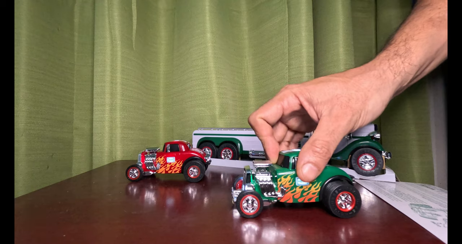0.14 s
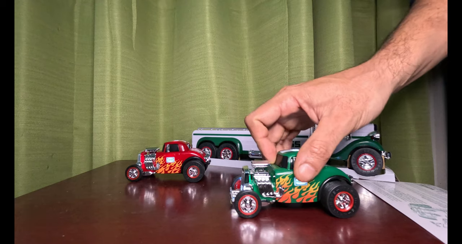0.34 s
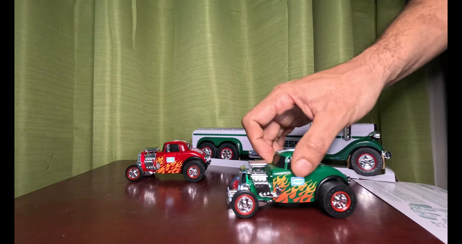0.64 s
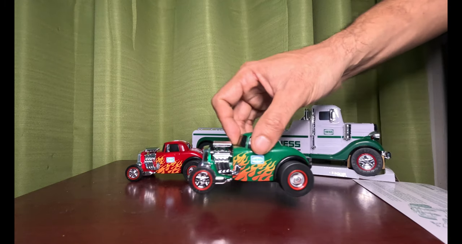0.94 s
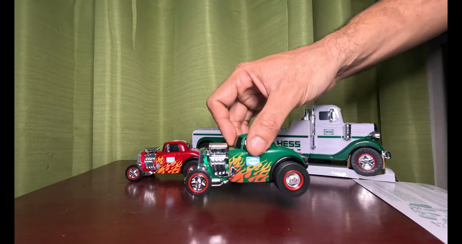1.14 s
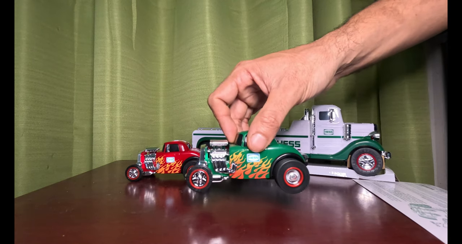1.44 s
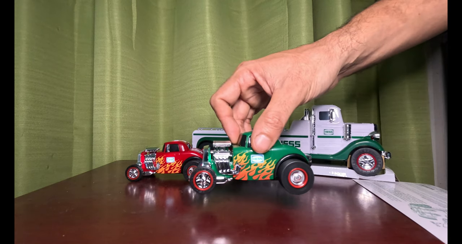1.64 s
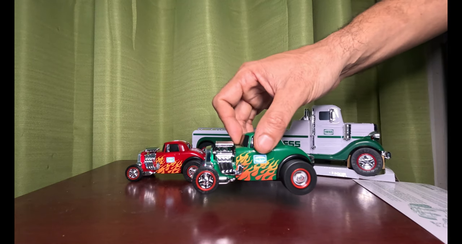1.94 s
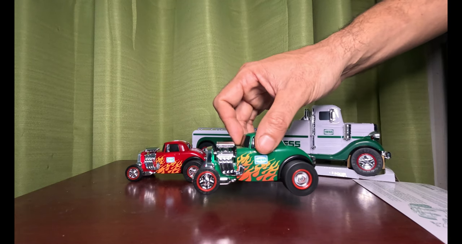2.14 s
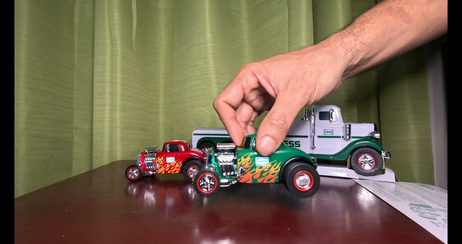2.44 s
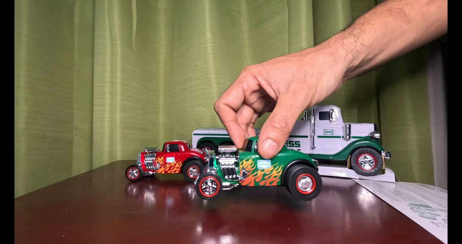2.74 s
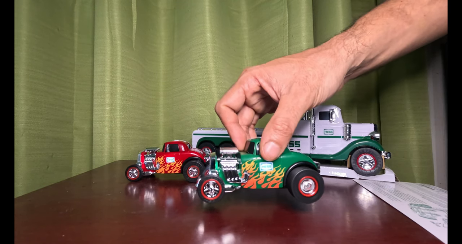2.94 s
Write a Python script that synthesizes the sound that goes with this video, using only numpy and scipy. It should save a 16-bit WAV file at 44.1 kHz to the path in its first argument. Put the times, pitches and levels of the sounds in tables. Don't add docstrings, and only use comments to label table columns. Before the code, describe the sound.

A toy car's spring motor, held by hand above a wooden table: faint finger clicks and soft thumps first, then gears spin up into rapid uneven rattling until the end, close stereo microphones, small room.

```python
import sys
import numpy as np
from scipy import signal
from scipy.fft import rfft, irfft
from scipy.io import wavfile
from scipy.ndimage import uniform_filter1d

SR = 44100
rng = np.random.default_rng(int(sys.argv[2]) if len(sys.argv) > 2 else 0)


def pcm_store(signal):
    levels = np.round(np.clip(np.atleast_2d(signal), -1, 1) * 32767)
    wavfile.write(sys.argv[1], SR, levels.astype(np.int16).T)


def ratio_of_db(decibels):
    return 10 ** (np.asarray(decibels, float) / 20)


N = 136710

# frequency_hz, density_db
FLOOR_SPECTRUM = [(25, -8.5), (65, -4), (110, -16), (250, -25.5), (400, -38.5), (900, -43.5), (6000, -58.5),
                  (11000, -68)]
# frequency_hz, coherence_0_to_1
FLOOR_COHERENCE = [(60, 0.94), (130, 0.95), (290, 0.12)]
# frequency_hz, left_minus_right_db
MIC_LEVEL = [(1000, -1), (5200, -2.5), (6600, 0), (8200, -3), (10000, -4), (13000, 0.5)]
# frequency_hz, left_lead_rad
MIC_PHASE = [(800, 0.042), (6000, -0.76), (7400, -1.22), (9000, -0.66)]
# top_s, peak_db, pitch_hz, swell_s, fade_s
TABLE_BOOMS = [(0.0, -35.5, 62.5, .02, 0.19), (.28, -35.5, 89.3, 0.036, 0.033),
               (0.369, -28, 81.4, 0.029, 0.027), (0.448, -28.5, 68, 0.026, 0.028),
               (0.507, -28.5, 72.4, 0.013, 0.024), (0.629, -37.5, 77.4, 0.1, 0.1),
               (0.704, -29.5, 85.3, 0.003, 0.056), (0.981, -47.5, 73.8, 0.16, 0.12),
               (1.222, -26.5, 69.3, 0.065, 0.052), (1.309, -32.5, 61, 0.016, 0.015),
               (1.385, -37, 70, 0.072, 0.058), (1.541, -38.5, 63.5, 0.02, 0.027),
               (1.97, -35.5, 73.3, 0.057, 0.1), (2.057, -35, 63.8, 0.0083, 0.069),
               (2.273, -37.5, 93.5, 0.044, 0.047), (2.76, -32.5, 68.8, 0.06, 0.094)]
# start_s, peak_db, ring_hz, t60_s
FINGER_TICKS = [
    (0.454, -49.5, 1210, 0.026),
    (0.486, -63, 5500, 0.021),
    (.505, -54.5, 5830, 0.023),
    (0.715, -42.5, 1230, 0.03),
    (.724, -37, 3160, 0.036),
    (0.754, -44, 4300, 0.03),
    (.787, -40, 1310, 0.029),
    (.788, -45, 3430, 0.033),
    (.836, -37, 1740, 0.047),
]
# start_s, top_s, end_s, level_db
TYRE_SCUFFS = [
    (-.1, 0.054, 0.6, -63),
    (0.59, 0.647, 0.684, -62.5),
]
# centre_hz, width_hz, level_db
DULL_SCUFF = [(1340, 190, 2), (1633, 130, 4.5), (4500, 1500, -22)]
# centre_hz, width_hz, level_db
BRIGHT_SCUFF = [(1950, 1300, 3.5), (5200, 490, -3), (6440, 810, 0), (10300, 910, -7)]
# time_s, level_db
SPIN_EFFORT = [(.795, -75), (.838, -48.5), (.88, -43), (.93, -36.5), (.965, -32), (1.02, -29.5),
               (1.1, -29.5), (1.2, -32.5), (1.26, -64)]
# time_s, level_db
FIRST_CATCHES = [
    (.842, -42.5),
    (.852, -54),
    (.861, -48),
    (.880, -44),
    (.901, -44),
    (.915, -32.5),
    (.959, -29),
]
# start_s, length_s, level_db
EARLY_BURSTS = [(1.1, 0.0059, -20), (1.124, 0.016, -21), (1.16, 0.031, -17.5), (1.2, 0.031, -22),
                (1.286, 0.051, -17), (1.35, 0.0085, -19), (1.37, 0.027, -17.5), (1.407, 0.071, -20.5),
                (1.511, 0.045, -27), (1.556, 0.063, -36.5), (1.604, 0.026, -25), (1.636, 0.0036, -21.5),
                (1.652, 0.027, -23), (1.7, 0.021, -18.5), (1.72, 0.03, -20.5), (1.774, 0.0092, -20.5),
                (1.808, 0.014, -20.5), (1.83, 0.022, -20.5), (1.867, 0.034, -18), (1.909, 0.006, -15.5),
                (1.934, 0.018, -21.5), (1.959, 0.045, -19.5), (2.015, 0.019, -20.5), (2.045, 0.016, -20)]
# start_s, length_s, level_db
LATE_BURSTS = [(2.08, 0.017, -24), (2.12, 0.03, -19.0), (2.164, 0.065, -19.5), (2.238, 0.041, -20.5),
               (2.276, 0.012, -21), (2.303, 0.041, -20.5), (2.364, 0.022, -19), (2.391, 0.013, -19.5),
               (2.421, 0.0053, -17.5), (2.442, 0.02, -18.5), (2.477, 0.054, -19), (2.543, 0.029, -22.5),
               (2.56, 0.039, -21), (2.607, 0.0052, -17), (2.63, 0.004, -18.5), (2.654, 0.015, -24.5),
               (2.711, 0.072, -19), (2.794, 0.011, -20), (2.826, 0.022, -17), (2.855, 0.0604, -21),
               (2.929, 0.032, -21.5), (2.965, 0.031, -19), (3.027, .003, -22), (3.034, 0.0078, -18.5),
               (3.061, 0.01, -22), (3.084, 0.0082, -19.5)]
# time_s, level_db
EARLY_SLAMS = [(1.113, -21.4), (1.1328, -19.3), (1.1546, -21.0), (1.1836, -18.3), (1.2024, -17.9),
               (1.2142, -21.3), (1.2656, -18.2), (1.2944, -16.3), (1.2995, -20.1), (1.3106, -18.3),
               (1.3198, -17.3), (1.3315, -16.4), (1.3518, -19.3), (1.362, -16.7), (1.3952, -20.0),
               (1.4105, -18.1), (1.4255, -18.2), (1.4439, -16.9), (1.4959, -20.5), (1.5309, -22.0),
               (1.5399, -19.6), (1.6064, -20.1), (1.6128, -19.0), (1.6396, -20.6), (1.6625, -18.9),
               (1.7071, -16.9), (1.7285, -20.6), (1.7352, -18.0), (1.7454, -16.8), (1.7576, -19.7),
               (1.7842, -19.9), (1.8006, -16.4), (1.8211, -19.2), (1.8349, -18.1), (1.8416, -18.8),
               (1.8915, -15.8), (1.9144, -18.5), (1.9194, -18.5), (1.9357, -21.3), (1.9474, -18.2),
               (1.9615, -18.2), (1.9676, -19.0), (1.9778, -19.2), (1.987, -17.7), (1.9945, -16.8),
               (2.0182, -16.5), (2.0294, -18.2), (2.0583, -17.7), (2.0669, -21.1), (2.0873, -19.9)]
# time_s, level_db
LATE_SLAMS = [(2.1293, -17.2), (2.1387, -19.4), (2.1717, -18.9), (2.1965, -20.2), (2.2064, -20.5),
              (2.2166, -20.5), (2.2411, -21.2), (2.2536, -17.6), (2.2613, -17.6), (2.27, -17.8),
              (2.2819, -18.5), (2.2866, -21.1), (2.3108, -19.2), (2.3217, -17.9), (2.3425, -21.3),
              (2.3837, -20.4), (2.3933, -20.5), (2.4083, -19.2), (2.4292, -21.3), (2.45, -20.9),
              (2.487, -16.8), (2.518, -18.6), (2.5315, -20.6), (2.5512, -19.9), (2.5639, -17.8),
              (2.5818, -19.9), (2.6148, -17.7), (2.6377, -21.4), (2.6649, -21.1), (2.7131, -20.3),
              (2.7239, -18.7), (2.7417, -20.3), (2.7591, -19.6), (2.771, -17.7), (2.8056, -21.5),
              (2.8395, -18.0), (2.8568, -19.7), (2.864, -20.0), (2.8707, -18.7), (2.892, -19.6),
              (2.903, -16.8), (2.9082, -18.4), (2.9518, -17.0), (2.9729, -19.5), (2.9972, -20.8),
              (3.0077, -22.4), (3.0216, -18.4), (3.0435, -21.8), (3.0678, -18.3), (3.0934, -19.5)]
# centre_hz, width_hz, level_db
SHELL_MODES = [(1337, 100, -3.5), (1620, 380, -11.5), (2170, 1500, -19), (3870, 455, -7.5),
               (4300, 490, -9.5), (4820, 644, -3.5), (4960, 310, -4.5), (5415, 280, -7.5), (5720, 21, -9.5),
               (6600, 670, -18), (7310, 630, -15.5), (9930, 1250, -16.5), (13330, 940, -37)]
# centre_hz, width_hz, gain_db
SHELL_HOLLOWS = [(1478, 221, -13), (2760, 166, -7), (5700, 210, 1)]
# centre_hz, width_hz, level_db
AXLE_MODES = [(477, 430, -19), (1390, 250, 5.5), (1924, 480, -1), (3370, 1900, -10)]
# centre_hz, width_hz, level_db
WHINE_MODES = [(7000, 560, 1), (10600, 750, 0.5)]

SLAM_LEAD_S = 0.0012


def evened(x):
    return x / np.sqrt(np.mean(x ** 2) + 1e-20)


def read(points, hz):
    f, value = np.transpose(points)
    return np.interp(np.log(hz + 1), np.log(f + 1), value)


def add(mix, s, sound):
    part = mix[round(s * SR):][:len(sound)]
    part += sound[:len(part)]


def body(peaks, hollows=(), ripple_db=0., skirt_db=-42.0, spot_db=0., shelf_db=-60.0, smear_s=0.):
    low_edge_hz = 997
    hz = np.fft.rfftfreq(8192, 1 / SR)
    power = ratio_of_db(2 * skirt_db) / (1 + (hz / 9000) ** 8)
    for f, w, db in peaks:
        power = power + ratio_of_db(2 * db) / (1 + (2 * (hz - f) / w) ** 2) ** 1.32
    shelf = ratio_of_db(2 * shelf_db) / (1 + (hz / 1000) ** 8 + (200 / (hz + 1)) ** 4)
    log = 0.5 * np.log(power / (1 + (low_edge_hz / (hz + 1)) ** 16) + shelf + 1e-9)
    for f, w, db in hollows:
        log += np.log(ratio_of_db(db)) / (1 + (2 * (hz - f) / w) ** 2)

    fine, broad, late = rng.standard_normal((3, len(hz)))
    delay = smear_s * abs(evened(uniform_filter1d(late, size=200)))
    lag = 2 * np.pi * hz[1] * np.cumsum(delay)
    log += np.log(ratio_of_db(ripple_db)) * evened(uniform_filter1d(fine, size=12))
    log += np.log(ratio_of_db(spot_db)) * evened(uniform_filter1d(broad, size=200))

    fold = irfft(log) * np.r_[1, 2 * np.ones(4095), 1, np.zeros(4095)]
    ring = irfft(np.exp(rfft(fold) - 1j * lag))[:4096]
    return ring / np.linalg.norm(ring)


def floor(shake):
    frames, hz = N // 512 + 5, np.fft.rfftfreq(2048, 1 / SR)
    a, b, c, d = rng.standard_normal((frames, 1025, 4)).T
    shaking = uniform_filter1d(abs(shake), size=9000)
    stir = 1 + ratio_of_db(37.5) * np.interp(np.arange(frames) * 512, np.arange(N), shaking)
    same = np.clip(read(FLOOR_COHERENCE, hz), 0, 1)[:, None]
    left = a + 1j * b
    right = same * left + np.sqrt(1 - same ** 2) * (c + 1j * d)
    z = np.array([left, right])
    z *= ratio_of_db(read(FLOOR_SPECTRUM, hz))[:, None] * np.where(hz[:, None] < 300, stir, 1)
    noise = signal.istft(z, nperseg=2048, noverlap=1536)[1][:, :N]
    return ratio_of_db(-47) * evened(noise)


def table():
    sag, sag_s = 0.19, 0.17
    out, t = np.zeros(N), np.arange(N) / SR
    for top, db, hz, swell, fade in TABLE_BOOMS:
        u = t - top
        shape = np.where(u < 0, np.exp(-(u / swell) ** 2), np.exp(-(abs(u) / fade) ** 1.08))
        bend = sag * 0.039 * np.log(np.cosh(np.clip(u / sag_s, -9, 9)))
        out += ratio_of_db(db) * shape * np.cos(2 * np.pi * hz * (u - bend))
    return out


def at_each_mic(x, taps):
    taps = taps / np.linalg.norm(taps, axis=1, keepdims=True)
    return signal.fftconvolve(x[None], taps, axes=1)[:, :N]


def room(x):
    t60_s, dull_hz = 0.5, 5000
    t = np.arange(SR // 4) / SR
    taps = rng.standard_normal((2, len(t))) * (rng.random((2, len(t))) < 0.06)
    taps = taps * ratio_of_db(-60 * t / t60_s) * (t > 0.002)
    return at_each_mic(x, signal.lfilter([1], [1, -np.exp(-2 * np.pi * dull_hz / SR)], taps))


def scatter(x):
    decay_s = 0.0072
    taps = rng.standard_normal((2, 600)) * np.exp(-np.arange(600) / (decay_s * SR))
    bright = signal.sosfilt(signal.butter(2, 10300, "high", fs=SR, output="sos"), x)
    return at_each_mic(bright, taps)


def fingers():
    out, t, whole = np.zeros(N), np.arange(3000) / SR, np.arange(N) / SR
    tick_low_pass = signal.butter(6, 10500, fs=SR, output="sos")
    for s, db, hz, t60 in FINGER_TICKS:
        puff = rng.standard_normal(len(t)) * ratio_of_db(-60 * t / t60)
        ring = signal.fftconvolve(puff, body([(hz, 0.3 * hz, 0)], skirt_db=-37))[:len(t)]
        ring = signal.sosfilt(tick_low_pass, ring)
        add(out, s, ratio_of_db(db) * ring / abs(ring).max())
    for (start, top, end, db), colour in zip(TYRE_SCUFFS, (DULL_SCUFF, BRIGHT_SCUFF)):
        stroke = np.interp(whole, [start, top, end], [0, 1, 0]) ** 1.27
        out += ratio_of_db(db) * signal.oaconvolve(stroke * rng.standard_normal(N), body(colour))[:N]
    return out


def slams():
    rise_s, fall_s, gain_db = 0.001, 0.0014, 1.1
    t, power = np.arange(N) / SR, np.zeros(N)
    for s, db in list(FIRST_CATCHES) + list(EARLY_SLAMS) + list(LATE_SLAMS):
        first = round(s * SR) - 400
        u = t[first:][:800] - s + SLAM_LEAD_S
        jolt = np.exp(-(u / np.where(u < 0, rise_s, fall_s)) ** 2)
        add(power, first / SR, ratio_of_db(2 * (db + gain_db)) * jolt)
    return power


def bursts(t):
    bite_s, let_go_s, gain_db, arch = 0.0019, 0.0024, -2, 0.38
    power = np.zeros(N)
    for start, length, db in list(EARLY_BURSTS) + list(LATE_BURSTS):
        before = np.maximum((start - t) / bite_s, 0)
        after = np.maximum((t - start - length) / let_go_s, 0)
        gate = np.exp(-2 * np.minimum(before + after, 30))
        progress = np.clip((t - start) / length, 0, 1)
        sink = 1 - arch * np.cos(np.pi * progress ** 0.39) ** 2
        power += ratio_of_db(2 * (db + gain_db)) * gate * sink
    return power


def teeth(t):
    wind_up_s, teeth_per_s, uneven_db, grit = 0.106, 900, 3, 0.43
    flutter_db, flutter_s, hold_s = 3.5, 0.0032, 0.0079
    speed = np.clip((t - SPIN_EFFORT[0][0]) / wind_up_s, 0.7, 1)
    knocks = (rng.random(N) < speed * teeth_per_s / SR) * rng.choice([-1, 1], N)
    knocks = knocks * ratio_of_db(uneven_db * np.minimum(rng.exponential(1, N), 3))
    wander = uniform_filter1d(rng.standard_normal(N), size=40)
    flutter = ratio_of_db(flutter_db * evened(signal.lfilter([1], [1, -np.exp(-1 / (flutter_s * SR))], wander)))
    drive = (evened(knocks) + grit * speed * rng.standard_normal(N)) * flutter
    local_power = signal.oaconvolve(drive ** 2, np.hanning(int(2 * hold_s * SR)), "same")
    return evened(drive / np.sqrt(local_power.clip(1e-6))), flutter


def steadied(x, power):
    steadiness = 0.56
    low = signal.sosfiltfilt(signal.butter(2, 1510, fs=SR, output="sos"), x)
    both = [np.roll(power, round(SLAM_LEAD_S * SR)), x ** 2]
    want, got = signal.oaconvolve(both, np.hanning(130)[None], "same").clip(1e-10)
    return low + (x - low) * np.clip(want / got, 0.1, 4) ** (steadiness / 2)


def motor():
    t = np.arange(N) / SR
    spin_db = np.interp(t, *np.transpose(SPIN_EFFORT), left=-140, right=-140)
    whirl = ratio_of_db(2.45 * (spin_db + 28.0) - 24.0)
    coast = ratio_of_db(2 * -37.5) * np.clip((t - 1) / 0.21, 0, 1)
    power = whirl ** 2 + coast + bursts(t)
    slam = slams()
    drive, flutter = teeth(t)

    jolt = drive * np.sqrt(power) + np.sqrt(slam) * rng.choice([-1., 1.], N)
    spot = rng.integers(0, 8, N)
    shell = np.zeros(N)
    for k in range(8):
        ring = body(SHELL_MODES, SHELL_HOLLOWS, ripple_db=1.5, skirt_db=-44.5, spot_db=0.5,
                    shelf_db=-41.5, smear_s=0.001178)
        shell += signal.oaconvolve(jolt * (spot == k), ring)[:N]
    shell = steadied(shell, power * flutter ** 2 + slam)

    rub = 0.55 * drive + 0.71 * rng.standard_normal(N)
    effort = ratio_of_db(spin_db) + ratio_of_db(-37.5) * (t > 1)
    axle = signal.oaconvolve(rub * effort, body(AXLE_MODES, SHELL_HOLLOWS[:1], shelf_db=-22.5))[:N]
    whine = signal.oaconvolve(drive * whirl, body(WHINE_MODES))[:N]
    return ratio_of_db(-1.31) * (shell + ratio_of_db(-8.5) * whine + ratio_of_db(-2.5) * axle)


def scene():
    car, booms = motor() + fingers(), table()
    hz = np.fft.rfftfreq(N, 1 / SR)
    half = ratio_of_db(read(MIC_LEVEL, hz) / 2) * np.exp(0.5j * read(MIC_PHASE, hz))
    pair = irfft(rfft(car) * np.array([half, 1 / half]), N)
    return pair + ratio_of_db(-15.5) * room(car) + ratio_of_db(-11) * scatter(car) + booms + floor(booms)


def band_limit(x):
    return signal.sosfilt(signal.butter(12, 15710, fs=SR, output="sos"), x)


def record(dry):
    dull = signal.sosfilt(signal.butter(20, 14100, fs=SR, output="sos"), dry)
    return band_limit(dull)


dry = scene()
out = record(dry)
pcm_store(out)
```